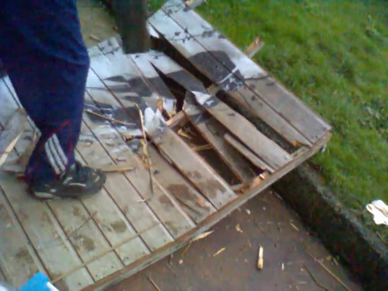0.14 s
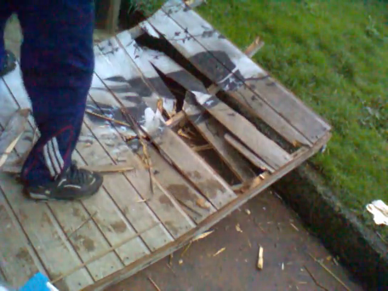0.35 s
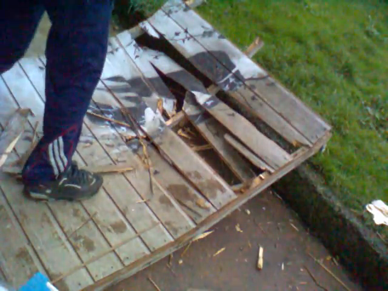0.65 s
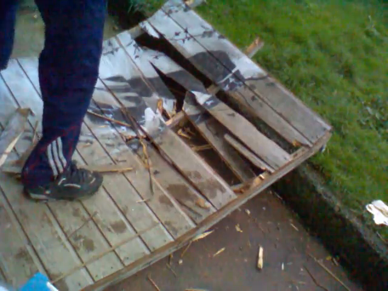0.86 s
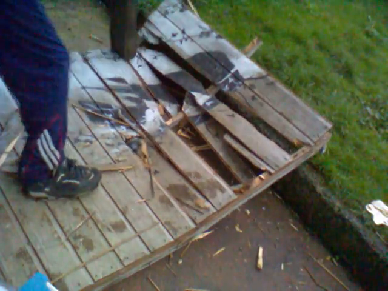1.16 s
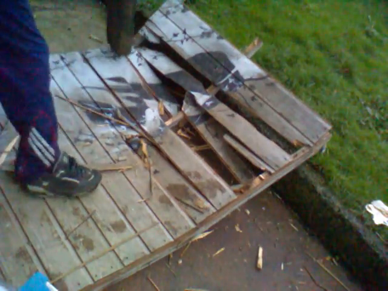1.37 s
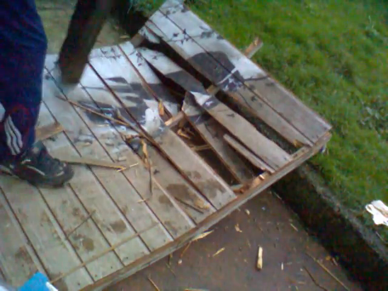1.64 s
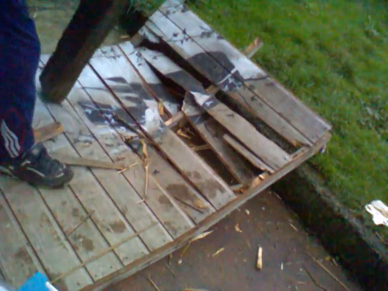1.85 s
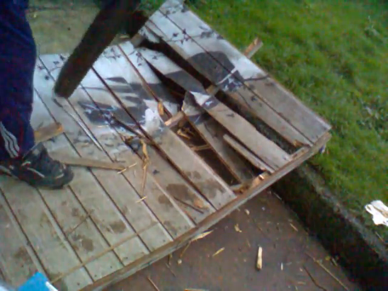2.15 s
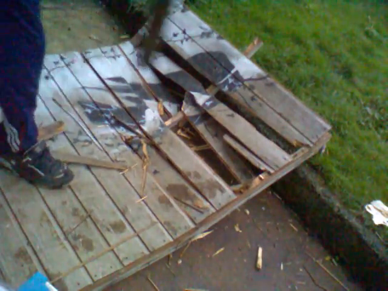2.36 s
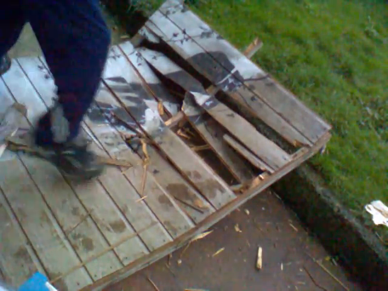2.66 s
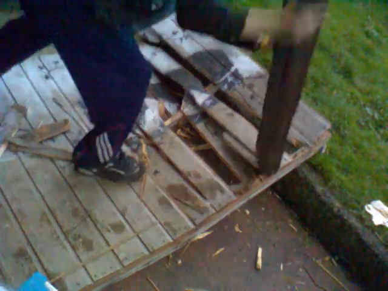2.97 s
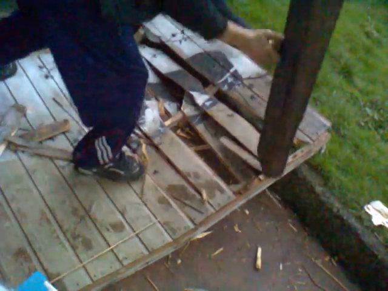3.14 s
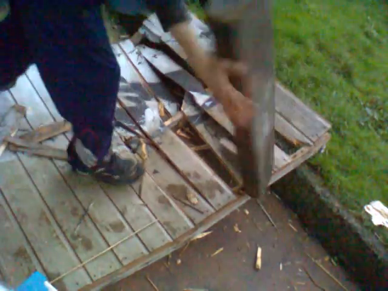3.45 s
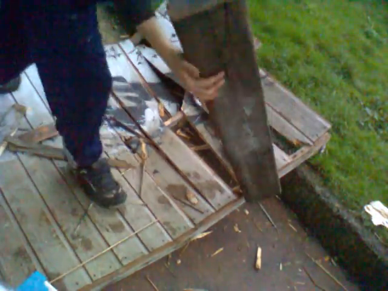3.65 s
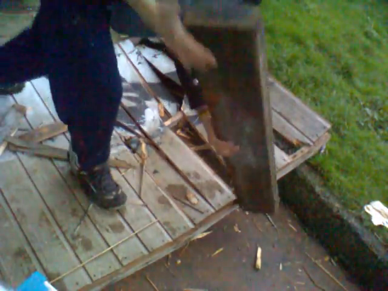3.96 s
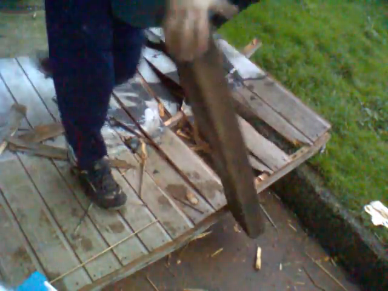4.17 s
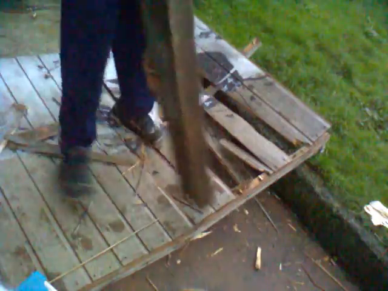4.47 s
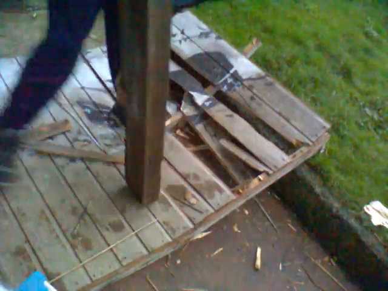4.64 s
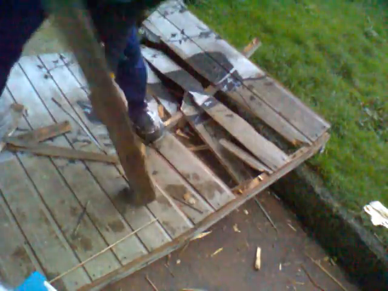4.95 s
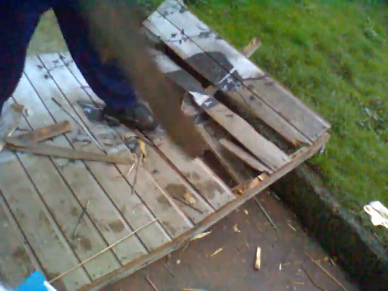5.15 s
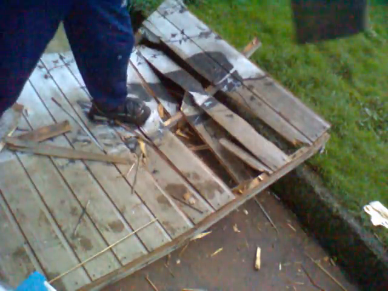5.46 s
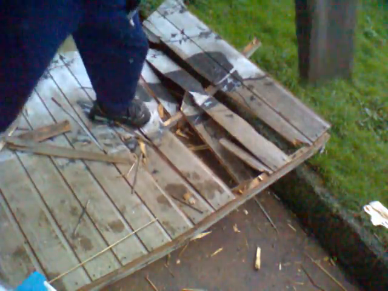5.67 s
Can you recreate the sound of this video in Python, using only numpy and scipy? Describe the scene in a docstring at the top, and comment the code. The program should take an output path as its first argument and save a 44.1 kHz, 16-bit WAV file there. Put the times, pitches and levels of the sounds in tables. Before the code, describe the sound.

A heavy timber rams wooden boards outdoors in irregular hard blows, with sharp cracks, splintering, hollow knocks, low thuds and rattling debris.

```python
"""A hard wooden blow is heard first, then more: a heavy timber is rammed into a panel of fence boards on pavement.
Each blow is fracture noise filtered by the boards' modes, a knock over the hollow and a low panel boom.
Loose boards knock, splinters snap, timber and shoes scrape, and debris settles, as shaped noise and grains.
Low thumps are damped sines; house walls answer with a diffuse noise tail, light wind is low noise in lumps,
and loud peaks are flattened."""
import sys
import numpy as np
from scipy import signal
from scipy.fft import rfft, irfft, next_fast_len
from scipy.io import wavfile
from scipy.ndimage import map_coordinates

SR = 44100
rng = np.random.default_rng(int(sys.argv[2]) if len(sys.argv) > 2 else 0)


def inscribe(sig):
    """Save sig as 16-bit PCM at rate SR to the path in sys.argv[1].

    A 1-D sig is mono; a 2-D sig holds one channel per row.
    Samples are clipped to [-1, 1] before scaling.
    """
    pcm = np.round(np.clip(np.atleast_2d(sig).T, -1, 1) * 32767)
    wavfile.write(sys.argv[1], SR, pcm.astype(np.int16))


N = 256220
T = np.arange(SR // 3) / SR  # time within one event [s]

# Blows of the timber: (time [s], crushing time [s], die-away t60 [s], crack level [dB], crack centre [Hz],
# centre lift [dB], splinter hiss level [dB], board knock level [dB], board pitch [Hz],
# panel boom level [dB], settling debris level [dB])
BLOWS = [(0.002, 0.0097, 0.059, -23, 1850, 9, -32, -23.5, 494, -27.5, -25.5),
         (1.294, 0.033, 0.21, -6, 1360, 2, -15, -14, 420, -22, -22.5),
         (1.888, 0.037, 0.13, -16.5, 2037, 3.5, -34, -12, 292, -23, -33),
         (3.155, 0.014, 0.26, -6.5, 3050, 6, -16.5, -13.5, 470, -16, -19.5),
         (3.402, 0.0071, 0.12, -22, 1040, 7, -46.5, -28, 424, -29.5, -39.5),
         (4.506, 0.029, .11, -11.5, 2150, 5, -21.5, -21, 360, -26, -47.5),
         (4.765, 0.031, 0.092, -10.5, 2283, 7, -21.5, -12, 387, -27, -30)]
# Bending modes of the boards, nominal before scatter: (frequency [Hz], width [Hz], relative level [dB])
BOARD_MODES = [(718, 87, 3.5), (850, 60, -3), (1050, 67, -7), (1165, 57, 0.5), (1334, 16, -2),
               (1461, 24, -6.5), (1677, 22, -1.5), (1793, 17, -1), (2025, 76, 1), (1860, 19, -12),
               (2303, 42, 2.5), (2700, 500, 8.5), (2960, 35, -8.5), (3060, 20, -2.5), (3226, 23, 2.5),
               (3730, 140, 10.5), (4825, 22, -11.5), (4770, 24, -15)]
# Spectrum of wood in rough contact: (frequency [Hz], relative density [dB per Hz])
WOOD_SPECTRUM = [(60, -29), (250, -5), (500, -2.5), (1000, -0.5), (2200, -2), (3600, -8.5), (5200, -17.5),
                 (9000, -24.5), (16000, -36.5)]
# Spectrum of tearing fibres: (frequency [Hz], relative density [dB per Hz])
FIBRE_SPECTRUM = [(500, -42.5), (2500, 4.5), (4500, 4), (8000, -7), (12000, -13.5), (16000, -19)]
# Spectrum of the panel flexing on the ground: (frequency [Hz], relative density [dB per Hz])
PANEL_SPECTRUM = [(15, -23), (35, -3), (55, 7.5), (90, -2.5), (130, -9.5), (200, -15.5), (500, -37),
                  (2000, -92.5)]


def amp(db):
    """Level to amplitude: 20 dB is a factor of ten."""
    return 10 ** (np.asarray(db) / 20)


def unit(x):
    """Normalization to an rms amplitude of 1."""
    return x / np.sqrt(np.mean(x ** 2) + 1e-20)


def along(points, hz):
    """Interpolation of (frequency, value) points on a logarithmic frequency axis."""
    f, v = np.transpose(points)
    return np.interp(np.log(hz + 1), np.log(f + 1), v)


def curve(rows):
    """Linear interpolation of (time, value) rows to one value per sample."""
    return np.interp(np.arange(N) / SR, *np.transpose(rows))


def colour(x, gain_db):
    """Minimum-phase filtering: folding the cepstrum makes a causal response from a gain curve."""
    m = 2 * next_fast_len(len(x) // 2 + 4096)
    hz = np.fft.rfftfreq(m, 1 / SR)
    cepstrum = irfft(np.log(amp(gain_db(hz)) + 1e-6))
    cepstrum[1:m // 2] *= 2
    cepstrum[m // 2 + 1:] = 0
    response = np.exp(rfft(cepstrum))
    return irfft(rfft(x, m) * response, m)[:len(x)]


def hump(hz, centre_hz, octaves, height_db):
    """Broad resonance: a Gaussian rise in level over log frequency."""
    return height_db * np.exp(-.5 * (np.log2((hz + 1) / centre_hz) / octaves) ** 2)


def add(track, s, x):
    """Superposition of event x on the track at time s."""
    start = max(0, round(s * SR))
    track[start:start + len(x)] += x[:max(0, N - start)]


def jitter(length, seconds):
    """Slow random fluctuation: random values at the given spacing, smoothly interpolated, rms 1."""
    step = seconds * SR
    points = rng.standard_normal(int(length / step) + 4)
    return unit(map_coordinates(points, [np.arange(length) / step]))


def steady_noise(spectrum):
    """Stationary random noise shaped to a spectrum, rms 1."""
    return unit(colour(rng.standard_normal(N), lambda hz: along(spectrum, hz)))


def grains(size, rate, spread_db):
    """Shot noise: impulses at random moments, of random sign and size, rms 1."""
    moments = rng.random(size) < rate / SR  # rate per second
    signs = rng.choice([-1, 1], size)
    sizes = amp(spread_db * rng.standard_normal(size))
    return unit(moments * signs * sizes)


def stroke(rise, hold, t60):
    """Contact force: it builds exponentially, lasts while the wood gives way, and decays."""
    return (1 - np.exp(-T / rise)) * amp(-60 * np.maximum(T - hold, 0) / t60)


def driven(x, force):
    """Energy scaling: x takes the rms of the force that drives it."""
    return unit(x) * np.sqrt(np.mean(force ** 2))


def swells(rows, rise, t60):
    """Incoherent addition: powers of overlapping (start, hold, level) movements sum to one amplitude."""
    power = np.zeros(N)
    for s, hold, db in rows:
        t = np.maximum(np.arange(N) / SR - s, 0)
        decay = amp(db - 60 * np.maximum(t - hold, 0) / t60)
        power += (decay * (1 - np.exp(-t / rise))) ** 2
    return np.sqrt(power)


def ring(x, modes, ring_db):
    """Modal resonance: x excites decaying cosines whose pitches and strengths scatter at each call."""
    response = np.zeros(len(T))
    for hz, width, db in modes:
        pitch = hz * (1 + .008 * rng.standard_normal())
        decay = np.exp(-np.pi * max(width, 26) * T)  # widths below 26 Hz decay as 26 Hz
        response += amp(db + 2 * rng.standard_normal()) * decay * np.cos(2 * np.pi * pitch * T)
    return x + amp(ring_db) * signal.fftconvolve(x, response / np.linalg.norm(response))[:len(x)]


def outdoors(wind_db, air_db):
    """Turbulent pressure: low noise in wind lumps on the microphone, over a faint steady hush."""
    # Wind strength before offset and gusts: (time [s], relative level [dB])
    wind = [(0.0, -47), (0.69, -40.5), (0.89, -55.5), (1.41, -46.5), (2.09, -45.5), (2.54, -53),
            (3.27, -40), (4.14, -64.5), (4.76, -45), (4.95, -33.5), (5.21, -64), (5.81, -34.5)]
    # Spectrum of wind buffeting: (frequency [Hz], relative density [dB per Hz])
    buffet_spectrum = [(10, -1.5), (25, 4.5), (52, 2.5), (90, -6), (140, -24), (250, -35), (500, -58),
                       (2000, -88)]
    # Spectrum of the steady hush: (frequency [Hz], relative density [dB per Hz])
    air_spectrum = [(30, 8.5), (200, -3.5), (500, -9), (2000, -13.5), (4000, -22), (8000, -23.5),
                    (16000, -21)]
    gust_db, gust_s = 4.5, .06  # rms depth and spacing of the lumps
    gusts = amp(curve(wind) + wind_db + gust_db * jitter(N, gust_s))
    return gusts * steady_noise(buffet_spectrum) + amp(air_db) * steady_noise(air_spectrum)


def yard(x, build_up_s, treble_db):
    """Diffuse reverberation: walls and paving scatter sound into a tail with a decay time for each band."""
    # Reverberation time: (frequency [Hz], t60 [s])
    reverberation = [(60, 0.23), (150, 0.49), (300, 0.48), (600, 0.33), (1500, 0.26), (3000, 0.26),
                     (6000, 0.22), (15000, 0.39)]
    hz, t, z = signal.stft(rng.standard_normal(SR), SR, nperseg=256)
    decay = amp(-60 * t / along(reverberation, hz)[:, None])
    tail = signal.istft(z * decay, SR, nperseg=256)[1]
    tail *= 1 - np.exp(-np.arange(len(tail)) / SR / build_up_s)
    echo = signal.fftconvolve(x, tail / np.linalg.norm(tail))[:N]
    return colour(echo, lambda hz: along([(3000, 0.014), (7000, treble_db)], hz))


def sway():
    """Damped flexure: low noise swells and dies as the panel rocks on after each boom."""
    sway_db = -10.5  # relative to the panel boom
    rocking = swells([(s, 0, boom_db) for s, *_, boom_db, _ in BLOWS], rise=.03, t60=1)
    return amp(sway_db) * rocking * steady_noise(PANEL_SPECTRUM)


def sliding(body_db):
    """Stick-slip friction: dense grains under uneven pressure excite the board modes, rms 1."""
    pressure = amp(2.5 * jitter(N, .018))
    slips = ring(pressure * grains(N, rate=2200, spread_db=1.5), BOARD_MODES, ring_db=-26.5)
    tone = lambda hz: along(WOOD_SPECTRUM, hz) + hump(hz, 420, octaves=0.44, height_db=body_db)
    return unit(colour(slips, tone))


def patter(rate, t60):
    """Random impacts: noise under a decaying envelope that starts at each contact."""
    contacts = np.abs(grains(N, rate=rate, spread_db=2.5))
    return signal.fftconvolve(contacts, amp(-60 * T / t60))[:N] * rng.standard_normal(N)


def debris():
    """Decaying unrest: after each blow broken pieces slide, rattle and tick, ever more faintly."""
    rattle_db, tick_db = -7.5, -24  # relative to the sliding debris
    # The debris starts to shift after a blow, then comes to rest.
    unrest = swells([(s, 0, debris_db) for s, *_, debris_db in BLOWS], rise=.03, t60=0.68)
    taps = ring(patter(rate=75, t60=.04), BOARD_MODES, ring_db=-8.5)
    rattle_tone = lambda hz: along(WOOD_SPECTRUM, hz) + hump(hz, 250, octaves=.6, height_db=2.5)
    rattle = unit(colour(taps, rattle_tone))
    # Small fibres let go.
    ticks = unit(colour(patter(rate=75, t60=.015), lambda hz: along(FIBRE_SPECTRUM, hz)))
    return unrest * (sliding(body_db=3) + amp(rattle_db) * rattle + amp(tick_db) * ticks)


def scrape():
    """Friction strokes: dragged timber and shuffled shoes take hold, slide over the boards and ease off."""
    # Strokes: (start time [s], hold time [s], level [dB])
    scrapes = [(.03, .14, -38), (.48, 0.33, -66.5), (1.08, .025, -54), (1.6, 0.13, -46), (2.39, 0.039, -67),
               (2.54, 0.066, -61), (2.78, .05, -53.5), (2.975, 0.31, -56), (3.33, 0.057, -30),
               (3.61, 0.069, -47.5), (3.75, 0.12, -68), (4.215, 0.032, -59), (4.29, 0.47, -63),
               (4.478, .03, -29), (5.21, 0.017, -57), (5.25, 0.15, -66.5), (5.383, 0.017, -49.5),
               (5.62, 0.27, -66.5)]
    return swells(scrapes, rise=.012, t60=0.19) * sliding(body_db=8)


def snaps():
    """Brittle fracture: a single splinter lets go as a short noise burst through a narrow resonance."""
    # Splinters snapping: (time [s], level [dB], pitch [Hz])
    snap_events = [(0.3326, -46, 3980), (0.49, -47, 3630), (0.5616, -65, 6050), (1.181, -60.5, 3380),
                   (1.302, -15, 4470), (1.491, -43.5, 5434), (1.734, -55.5, 9000), (4.48, -45.5, 8020),
                   (4.5027, -28, 7570)]
    out = np.zeros(N)
    force = stroke(rise=.0001, hold=.0013, t60=.04)
    for s, db, pitch_hz in snap_events:
        # A broad bright tick with a narrow ring on top.
        tone = lambda hz: (hump(hz, pitch_hz, octaves=.5, height_db=18)
                           + hump(hz, pitch_hz, octaves=.06, height_db=6))
        tick = driven(colour(force * rng.standard_normal(len(T)), tone), force)
        add(out, s, amp(db) * tick)
    return out


def thumps():
    """Damped oscillation: low thumps of the blows, pushes and footfalls swing the panel for a cycle or two."""
    # Low thumps: (time [s], peak level [dB], pitch [Hz])
    thump_events = [(0.232, -36, 157), (0.322, -34.5, 81), (0.393, -33, 177), (0.549, -25.5, 68.2),
                    (0.611, -36, 168.2), (0.743, -33, 129.2), (0.796, -36, 177.6), (1.65, -27.5, 87.9),
                    (1.349, -17, 100), (1.889, -3.5, 235), (1.906, -3, 250), (2.069, -19.5, 233),
                    (2.761, -15.5, 78), (2.969, -34, 66), (3.08, -38, 329), (3.194, -8, 85.45),
                    (3.28, -22, 74.6), (4.233, -33, 70), (4.446, -34.5, 69), (4.77, -7.5, 190),
                    (4.938, -31, 83), (5.644, -31.5, 63.4)]
    cycles = 2.7  # cycles in which the swing decays by 60 dB
    out = np.zeros(N)
    for s, db, hz in thump_events:
        onset = (1 - np.exp(-T * hz)) ** 2
        swing = np.sin(2 * np.pi * hz * T) * onset * amp(-60 * T * hz / cycles)
        add(out, s, amp(db) * swing / np.abs(swing).max())
    return out


def crack(force, centre_hz, lift_db, treble_db):
    """Clustered fracture: a run of sharp contacts in clumps excites the boards' bending modes."""
    clumps = amp(2.5 * jitter(len(T), .002))
    impulses = force * clumps * grains(len(T), rate=3000, spread_db=3)
    breaks = ring(impulses, BOARD_MODES, ring_db=-12)
    tone = lambda hz: (along(WOOD_SPECTRUM, hz) + hump(hz, centre_hz, octaves=0.67, height_db=lift_db)
                       + along([(3000, 0.0022), (9000, treble_db)], hz))
    return driven(colour(breaks, tone), force)


def splinters(force):
    """Fibre tearing: dense shot noise in bright, uneven spurts."""
    spurts = amp(4.5 * jitter(len(T), .0015))
    tears = force * spurts * grains(len(T), rate=5700, spread_db=2)
    return driven(colour(tears, lambda hz: along(FIBRE_SPECTRUM, hz)), force)


def knock(force, pitch_hz):
    """Coupled resonance: the struck board's low note sounds over the modes of the hollow beneath."""
    # Modes of the hollow under the panel, nominal before scatter:
    # (frequency [Hz], width [Hz], relative level [dB])
    hollow_modes = [(169, 28, -3), (221, 27, 1), (282, 27, 2), (378, 36, -3), (424, 34, 1), (485, 45, -6),
                    (560, 70, -10)]
    # Spectrum of the low note: (frequency [Hz], relative density [dB per Hz])
    note_spectrum = [(30, -25.5), (110, -17.5), (170, -1.5), (230, 3.5), (330, 0), (440, 2.5), (560, 0),
                     (750, -15.5), (1500, -30), (5000, -67)]
    push = ring(force * rng.standard_normal(len(T)), hollow_modes, ring_db=-20.5)
    tone = lambda hz: along(note_spectrum, hz) + hump(hz, pitch_hz, octaves=0.16, height_db=5.5)
    return driven(colour(push, tone), force)


def boom(force):
    """Plate flexure: the force drives low noise as the whole panel bends against the ground."""
    push = force * rng.standard_normal(len(T))
    return driven(colour(push, lambda hz: along(PANEL_SPECTRUM, hz)), force)


def knocks():
    """Light impact: loose boards and shoes land with an edge tick, a duller chatter, a note and a thud."""
    # Landings: (time [s], clack level [dB], edge tick level [dB], knock level [dB], board pitch [Hz])
    landings = [(0.016, -27, -42, -22, 472), (0.078, -32.5, -42, -57, 434), (0.162, -42, -46.5, -43, 440),
                (0.46, -49, -75, -47.5, 437), (1.069, -57, -61.5, -53, 300), (1.422, -31, -48, -48, 408.4),
                (2.067, -44, -60.5, -31, 250), (2.108, -44.5, -53, -47, 292), (2.161, -42.5, -69, -41, 306),
                (2.283, -58, -81, -49.5, 311.6), (2.764, -51, -54.5, -36, 417),
                (2.806, -49.5, -63, -41.5, 477), (3.01, -54.5, -69, -39, 432), (3.112, -63, -67, -37, 470),
                (3.192, -19.5, -38.5, -15.5, 246.2), (3.724, -63, -81, -46, 348),
                (4.235, -63, -63, -58, 278), (4.861, -34, -48, -45.5, 400), (4.881, -39, -46, -29, 294),
                (4.9392, -40.5, -40.5, -46, 400), (4.983, -43, -46.5, -39, 410),
                (5.027, -46, -46, -62, 440), (5.07, -46, -64, -55.5, 428), (5.1972, -46.5, -52, -56.5, 422)]
    thud_db = -8  # panel thud relative to the knock
    out = np.zeros(N)
    contact = 1 + .7 * np.exp(-T / .004)  # strongest at first touch
    chatter = stroke(rise=.0003, hold=.007, t60=.09)
    for s, clack_db, tick_db, knock_db, pitch_hz in landings:
        clack = crack(contact * chatter, centre_hz=1410, lift_db=5, treble_db=-6)
        tick = splinters(stroke(rise=.0001, hold=0.00202, t60=0.026))
        note = knock(stroke(rise=0.0003, hold=0.011, t60=0.11), pitch_hz)
        thud = boom(stroke(rise=0.00068, hold=0.0057, t60=0.026))
        low = note + amp(thud_db) * thud
        add(out, s, amp(clack_db) * clack + amp(tick_db) * tick + amp(knock_db) * low)
    return out


def blows():
    """Inelastic impact: the timber crushes fibres for up to a few hundredths of a second and booms the panel."""
    out = np.zeros(N)
    for (s, crush, fade, crack_db, centre_hz, lift_db,
         hiss_db, knock_db, pitch_hz, boom_db, _) in BLOWS:
        crushing = stroke(rise=0.00049, hold=crush, t60=fade)
        tearing = stroke(rise=.0005, hold=crush * .4, t60=fade)
        striking = stroke(rise=0.00057, hold=crush * .5, t60=0.2)
        flexing = stroke(rise=0.021, hold=crush, t60=0.6)
        add(out, s, amp(crack_db) * crack(crushing, centre_hz, lift_db, treble_db=1.0))
        add(out, s + .002, amp(hiss_db) * splinters(tearing))  # fibres give way a moment later
        add(out, s, amp(knock_db) * knock(striking, pitch_hz))
        add(out, s, amp(boom_db) * boom(flexing))
    return out


def scene():
    """Superposition of the direct wood sounds, their reverberation and the open air."""
    wood = blows() + knocks() + thumps() + snaps() + scrape() + debris() + sway()
    echo = amp(-14.5) * yard(wood, build_up_s=0.044, treble_db=-5.0)
    return (wood + echo + outdoors(wind_db=0.5, air_db=-65))[None]


def record(dry):
    """Saturation and band limiting: the microphone flattens loud peaks, then a sharp low-pass follows."""
    ceiling, top_hz = .75, 16000  # amplitude limit, upper band edge [Hz]
    clipped = dry / (1 + np.abs(dry / ceiling) ** 6) ** (1 / 6)
    m = next_fast_len(N + SR)
    passband = np.fft.rfftfreq(m, 1 / SR) < top_hz
    return irfft(rfft(clipped, m) * passband, m)[:, :N]


dry = scene()
out = record(dry)
inscribe(out)
```